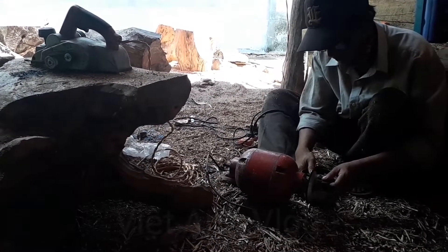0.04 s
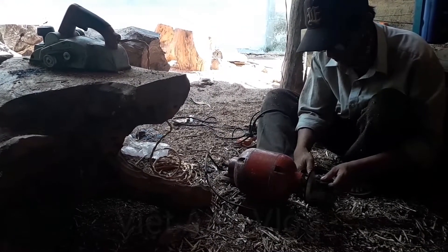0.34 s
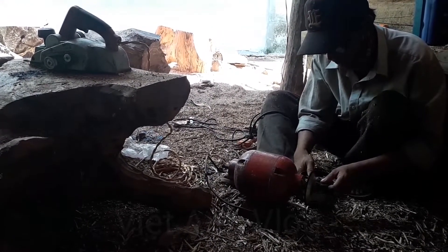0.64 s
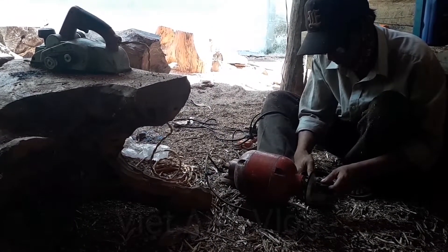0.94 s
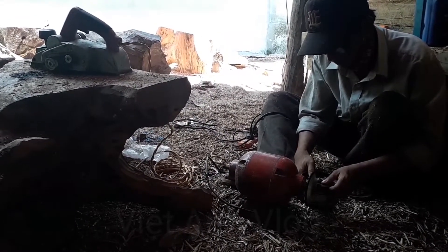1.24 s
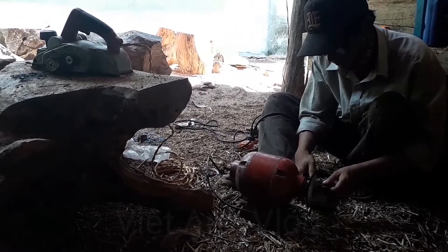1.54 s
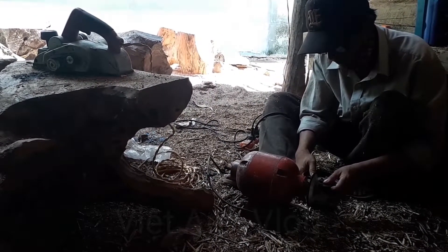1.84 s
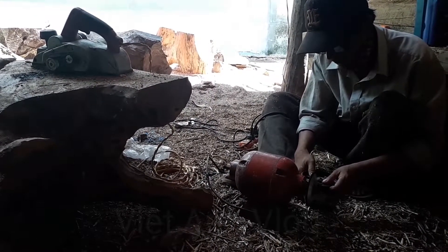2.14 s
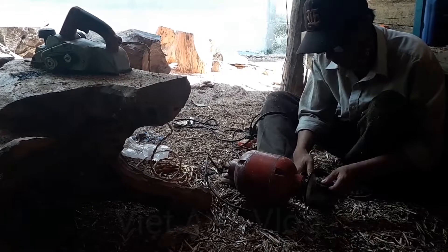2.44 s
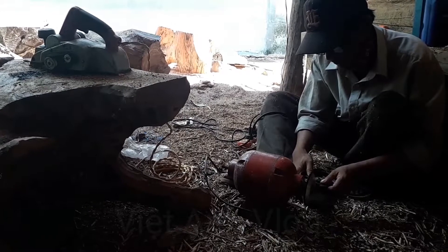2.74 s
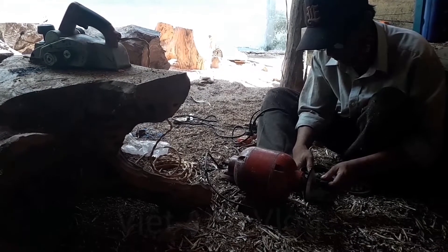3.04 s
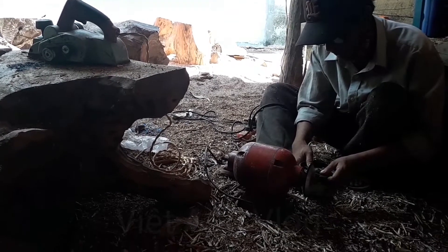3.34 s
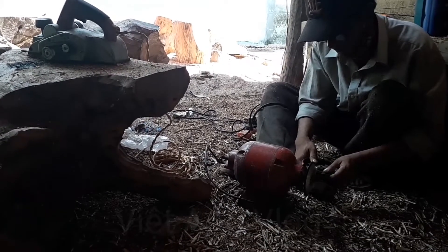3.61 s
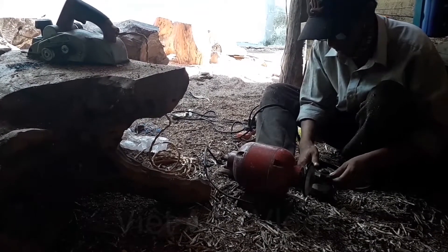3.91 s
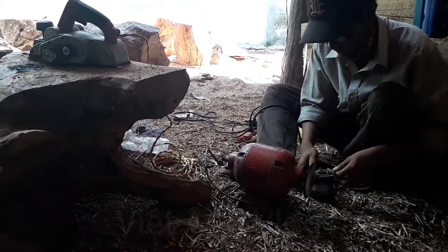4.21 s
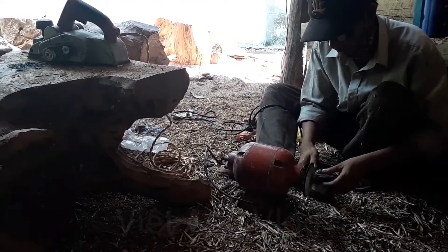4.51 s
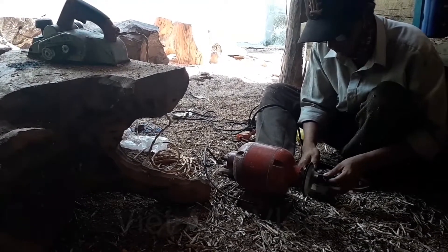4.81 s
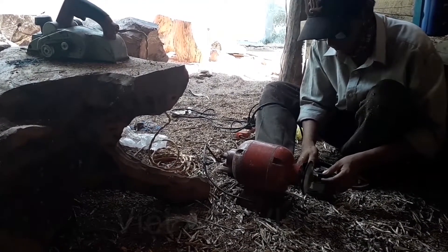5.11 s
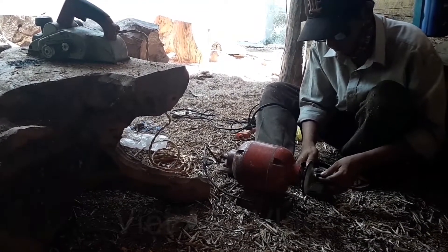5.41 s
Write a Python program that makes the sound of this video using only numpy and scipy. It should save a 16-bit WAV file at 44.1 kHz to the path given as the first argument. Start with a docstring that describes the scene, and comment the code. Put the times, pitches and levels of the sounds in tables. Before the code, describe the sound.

From the start, an electric grinder whirs in a workshop while a hand holds a piece against its wheel. The piece squeals in very fast, high-pitched bursts, uneven in loudness, over a gritty scrape, a hiss and a faint throb from the loaded motor. Around 0.3 seconds and again near 1.7 to 2.1 seconds the push eases: the squeal dips slightly in pitch and a lower ring swells. From about 2.9 seconds the piece bounces harder and the squeal flutters more roughly. At about 3.6 seconds it lifts off with a flick of hiss and a few tiny, bright ticks. The motor speeds up slightly and runs free with a quieter, steady whirr and whine. From about 4.5 seconds this gradually grows louder, and it continues to the end at about 5.6 seconds. The sound is dry and mono, with little deep bass.

```python
"""A hand holds a workpiece against an electric grinder on a workshop floor. Over the induction motor's
whirr, high spots on the wheel make the piece squeal in bursts, turn after turn, on a gritty scrape.
The push slows the shaft, raises the squeal and feeds the hiss; twice it eases and a lower ring swells.
The piece bounces harder, then lifts off with a flick of hiss and a few bright ticks. The motor speeds
up and runs free, and the mono recorder's gain control slowly brings it up."""
import sys
import numpy as np
from scipy import signal
from scipy.fft import rfft, irfft, next_fast_len
from scipy.io import wavfile
from scipy.ndimage import uniform_filter1d, minimum_filter1d, map_coordinates

SR = 44100
rng = np.random.default_rng(int(sys.argv[2]) if len(sys.argv) > 2 else 0)


def to_wav(sig):
    """Store sig (one row per channel, or 1-D mono) as 16-bit WAV at the path in sys.argv[1].

    Samples outside -1..1 are clipped; the rate is SR.
    """
    pcm = np.clip(np.atleast_2d(sig), -1, 1) * 32767
    pcm = np.round(pcm).astype(np.int16)
    wavfile.write(sys.argv[1], SR, pcm.T)  # frames by channels


N = 245195
T = np.arange(N) / SR
MAINS_HZ, FREE_HZ, SAG_HZ = 50, 47.85, 2.25  # supply; free shaft; speed lost to a firm push (force 1)
LIFT_S, LIFT_TAKES_S = 3.555, .06

# shaft speed, sagging under the push: t/s, speed/(turns per s)
SHAFT_SPEED = [(0, 45.98), (.1, 46.05), (.2, 46.72), (.3, 46.82), (.4, 45.92), (.5, 45.7), (1, 45.76),
               (1.4, 45.5), (1.7, 46.28), (1.95, 46.1), (2.1, 46.36), (2.2, 45.56), (2.8, 45.22),
               (3.5, 45.52), (3.6, 47.5), (3.75, 47.85), (5.56, 47.84)]
# whirr of bearings and fan: f/Hz, level/dB per Hz
WHIRR_SPECTRUM = [(40, -90.5), (160, -83), (240, -84), (340, -74.5), (520, -79.5), (660, -71.5), (800, -77),
                  (1150, -68), (1450, -74), (1700, -60.5), (2500, -59.5), (3400, -64), (5700, -63.5),
                  (6700, -70), (8050, -70.5), (8600, -81), (9600, -77), (11500, -80.5), (15000, -76)]
# motor housing resonances: f/Hz, width/Hz, level/dB
HOUSING_MODES = [(3673, 210, -38.5), (4590, 81, -52), (5357, 160, -36.5), (10290, 120, -52)]
# motor tones: shaft multiple, added mains multiple, free level/dB, loaded level/dB
MOTOR_TONES = [(0, 2, -65.5, -73.5), (2, 0, -65, -74.5), (0, 4, -64, -76), (5, 0, -66, -86),
               (0, 6, -62.5, -81), (13, 0, -77, -60), (16, 0, -75, -66), (18, 0, -51.5, -50),
               (20, 0, -76, -55), (18, 2, -47.5, -53.5), (18, 3, -48, -55), (18, 4, -48, -42),
               (18, 5, -54, -62), (18, 6, -48, -66), (27, 0, -66, -49)]
# bearing whine at free speed: f/Hz, relative level/dB
BEARING_TONES = [(1599, -41), (1626, -43), (1728, -39), (1836, -39), (1879, -40), (2024, -39), (2067, -39),
                 (2353, -38), (2401, -39), (2492, -40), (2632, -42), (2772, -39), (2821, -38), (2869, -41),
                 (3101, -42), (3246, -44), (3300, -45), (3435, -44), (3666, -40), (4177, -46), (4511, -43),
                 (5254, -44)]
# each ring's rhythm within one turn: shaft angle/turns, half length/turns, relative level/dB
SQUEAL_BURSTS = [(.21, .085, -2.5), (.49, .095, 0), (.74, .095, -1), (.99, .085, -4)]
LOW_BURSTS = [(1, 0.33, -1.5), (.3, 0.062, -9)]
MIDDLE_BURSTS = [(0.271, 0.2, 1.2), (.56, 0.032, 4), (0.878, 0.13, 1.7)]
# fader ride on the squeal: t/s, relative level/dB
SQUEAL_FADER = [(0.0, -12), (0.33, -11.5), (0.35, -20), (0.45, -13), (1.02, -15.5), (1.28, -19),
                (1.49, -11.5), (1.76, -17), (1.91, -12.5), (2.01, -16), (2.24, -11.5), (2.33, -20),
                (2.38, -11), (2.54, -19.5), (2.76, -14.5), (3.55, -17.5)]
# shudder of the rest under the piece: f/Hz, relative level/dB
SHUDDER_SPECTRUM = [(220, -34), (440, 0), (720, 12), (950, 1), (2000, -45)]
# scrape of wheel on piece: f/Hz, relative level/dB
SCRAPE_SPECTRUM = [(100, -100), (400, -98), (750, -110), (1350, -83), (1750, -60), (2700, -59.5),
                   (3400, -72.5), (4000, -62.5), (4400, -38.5), (4780, -62.5), (5100, -87), (5900, -62),
                   (6600, -103), (9000, -83)]
# the piece's lesser resonances: f/Hz, width/Hz, relative level/dB
PIECE_MODES = [(2402, 67, -33.5), (3640, 36, -35.5), (4030, 120, -30), (4920, 110, -36), (5550, 52, -43),
               (5870, 150, -51)]
# hiss of the grit: f/Hz, relative level/dB
HISS_SPECTRUM = [(3000, -18.5), (5500, 8.5), (6600, -6), (8050, 4.5), (8800, -6), (11500, -6.5),
                 (13000, 2.5), (14000, 0.5), (15000, 2.5)]
# motor tones that throb under load: shaft multiple, relative level/dB
THROB_TONES = [(11, -52.5), (20, -47)]
# motor tones that stand out near one force: shaft multiple, force, full level/dB
STRAIN_HUMS = [(15, .45, -43), (16, .72, -46.5), (13, .92, -52)]
# last grains catching the edge: t/s, relative peak level/dB
LAST_TICKS = [(3.5443, -12), (3.566, -10), (3.5824, -13), (3.5872, -6), (3.6042, -9), (3.6296, -11.5)]


def undb(db):
    """Decibels to gain."""
    return 10 ** (np.asarray(db) / 20)


def unit(x):
    """Scale to rms 1."""
    return x / np.sqrt(np.mean(x ** 2))


def walk(rate):
    """Smooth random drift, rms 1, with `rate` new values a second."""
    knots = rng.standard_normal(int(N / SR * 400))
    return unit(map_coordinates(knots, [T * rate], order=3, mode="wrap"))


def colour(x, points):
    """EQ white sound to a curve of f/Hz, level/dB per Hz points."""
    hz, db = np.transpose(points)
    size = next_fast_len(N)
    f = np.maximum(np.fft.rfftfreq(size, 1 / SR), 1)
    eq = undb(np.interp(np.log(f), np.log(hz), db))
    return irfft(rfft(x, size) * eq, size)[:N] * np.sqrt(SR / 2)


def resonate(x, hz, width):
    """One resonance with steep skirts, rms 1."""
    b, a = signal.iirpeak(hz, hz / width, fs=SR)
    return unit(signal.lfilter(b, a, signal.lfilter(b, a, x)))


def body(x, modes):
    """A bank of resonances shaken by x."""
    return sum(undb(db) * resonate(x, hz, width) for hz, width, db in modes)


def surface(turns, memory, size=1024):
    """Roughness round a turning part; each turn keeps a share of the last one's texture."""
    fresh = rng.standard_normal((int(turns[-1]) + 20, size))
    worn = signal.lfilter([1], [1, -memory], fresh, axis=0)
    return unit(map_coordinates(worn.ravel(), [(turns + 10) * size], order=3))


def push_gain(force, firm_db, lost_db, db_per_s):
    """A layer's fader: it falls ever faster as the push eases, and drifts with time."""
    return undb(firm_db - lost_db * np.maximum(1 - force, 0) ** 2 + db_per_s * T)


def sweet_spot(force, at_force, spread, build_s=.14):
    """0-1: how far a resonance that needs a certain force has built up."""
    return uniform_filter1d(np.exp(-((force - at_force) / spread) ** 2), int(build_s * SR))


def motor(turns, load):
    """Rotor slots and mains sing clean tones; bearings and fan add whine and a whirr in the housing."""
    out = colour(surface(turns, memory=.27), WHIRR_SPECTRUM)
    out += body(surface(turns, memory=.22), HOUSING_MODES)
    for shaft, mains, free_db, load_db in MOTOR_TONES:
        cycles = shaft * turns + mains * MAINS_HZ * T + rng.random()
        level_db = free_db + load * (load_db - free_db) + walk(9)
        out += undb(level_db) * np.sqrt(2) * np.sin(2 * np.pi * cycles)
    for hz, db in BEARING_TONES:
        phase = 2 * np.pi * hz * turns / FREE_HZ + .85 * walk(11)
        out += undb(db - 3 - 6.4 * load + 2.1 * walk(16)) * np.sqrt(2) * np.sin(phase)
    return out


def drone(hz, db):
    """A faint, steady low drone under the scene."""
    return undb(db) * np.sqrt(2) * np.sin(2 * np.pi * hz * T + .4 * walk(6.3))


def chatter(turns, hz, bursts, slip_rad, scatter_db, detune_hz):
    """Each high spot swells a ring once a turn, a little off in pitch, timing, phase and level."""
    out, count = np.zeros(N), int(turns[-1]) + 4
    hz = np.broadcast_to(hz, N)
    for angle, half_length, db in bursts:
        detune, late, slip, accent = rng.standard_normal((count, 4)).T
        place = turns - angle + 2
        turn = np.round(place).astype(int)
        centre_s = np.interp(np.arange(count), place, T)
        pitch = np.interp(centre_s, T, hz) + detune_hz * detune
        swell = np.exp(-((place - turn - .015 * late[turn]) / half_length) ** 2)
        phase = 2 * np.pi * pitch[turn] * (T - centre_s[turn]) + np.cumsum(slip_rad * slip)[turn]
        out += undb(db + scatter_db * accent)[turn] * swell * np.sin(phase)
    return unit(out)


def squeal(turns, force):
    """The lead voice: bursts from the high spots, roughened by grit, ring the piece's main resonance."""
    pitch_hz = 4385 + 250 * (force - 1)
    bursts = chatter(turns, pitch_hz, SQUEAL_BURSTS, slip_rad=.6, scatter_db=1.3, detune_hz=22)
    rough = .36 * resonate(surface(turns, memory=.85), hz=4380, width=450)
    bounce = np.where(T > 2.94, .86, .064)  # once a turn, much deeper shortly before the lift
    pressure = 1 + bounce * np.cos(2 * np.pi * (turns - .58))
    pressure /= np.sqrt(1 + bounce + bounce ** 2 / 2)  # holds the level down as the bounce deepens
    rung = resonate(pressure * (bursts + rough), hz=4375, width=540)
    fader_db = np.interp(T, *np.transpose(SQUEAL_FADER))
    return undb(fader_db - 1.8) * rung


def low_ring(turns, force, rub):
    """Under a light touch the piece's low ring swells, and the rest shudders along with it."""
    ring = chatter(turns, 1526, LOW_BURSTS, slip_rad=.34, scatter_db=1.5, detune_hz=13)
    shudder = undb(-17.5) * unit(colour(rub, SHUDDER_SPECTRUM))
    level_db = -36 + .9 * T + 8 * sweet_spot(force, at_force=.62, spread=.16)
    return undb(level_db) * (ring + shudder)


def middle_ring(turns, force):
    """A ring that needs a firm push and climbs in pitch as the piece is worked."""
    pitch_hz = np.interp(T, (1, 3.1), (2930, 3037))
    ring = chatter(turns, pitch_hz, MIDDLE_BURSTS, slip_rad=.62, scatter_db=1, detune_hz=47.6)
    return push_gain(force, firm_db=-28, lost_db=38, db_per_s=.7) * ring


def scrape(turns, force, rub):
    """Grit rubs the piece and rings its lesser modes; the out-of-true wheel swells it once a turn."""
    texture = colour(rub, SCRAPE_SPECTRUM) + body(surface(turns, memory=.83), PIECE_MODES)
    runout = 1 + .22 * np.cos(2 * np.pi * turns)
    return push_gain(force, firm_db=0, lost_db=5, db_per_s=.075) * texture * runout


def grit_hiss(turns, force, contact):
    """Grit bites in uneven grains, hardest at one proud spot on the rim; the edge flares sliding off."""
    proud_spot = np.exp(-((turns - .75) % 1) / .16)
    grains = surface(turns, memory=.43) * undb(2.5 * proud_spot + 2 * walk(380))
    pressed = contact * push_gain(force, firm_db=-22, lost_db=51, db_per_s=-1.64)
    edge_flare = undb(-21.5) * np.exp(-((T - 3.59) / .045) ** 2)
    return (pressed + edge_flare) * unit(colour(grains, HISS_SPECTRUM))


def throb(turns, force):
    """Under load two low motor tones throb together, slower as the push grows."""
    throb_hz = 7.5 - 6.5 * (force - 1)
    beat = np.cos(np.pi * np.cumsum(throb_hz) / SR + .3 * walk(2))
    return sum(undb(db) * 2 * beat * np.sin(2 * np.pi * order * turns) for order, db in THROB_TONES)


def strain_hums(turns, force):
    """Motor tones that come and go as the push changes."""
    out = np.zeros(N)
    for order, at_force, db in STRAIN_HUMS:
        swell = sweet_spot(force, at_force, spread=.18)
        out += undb(db) * swell * np.sqrt(2) * np.sin(2 * np.pi * order * turns)
    return out


def last_ticks(decay_s, trim_db):
    """The last grains catch the edge as it lifts away: tiny, very bright scratches."""
    envelope = sum(undb(db + trim_db) * (T >= s) * np.exp(-np.abs(T - s) / decay_s)
                   for s, db in LAST_TICKS)
    return envelope * resonate(rng.standard_normal(N), hz=14600, width=2500)


def scene():
    """One shaft sets the rhythm, and its sag tells the hand's force; both channels carry the same mix."""
    speed = np.interp(T, *np.transpose(SHAFT_SPEED))
    turns = np.cumsum(speed) / SR
    force = (FREE_HZ - speed) / SAG_HZ
    contact = np.clip(1 - (T - LIFT_S) / LIFT_TAKES_S, 0, 1)
    strain = throb(turns, force) + strain_hums(turns, force)
    rub = surface(turns, memory=.67)
    rings = low_ring(turns, force, rub) + middle_ring(turns, force) + squeal(turns, force)
    grinding = contact * (strain + rings + scrape(turns, force, rub))
    sizzle = grit_hiss(turns, force, contact) + last_ticks(decay_s=.0022, trim_db=-7.5)
    mix = grinding + sizzle + motor(turns, load=contact) + drone(hz=67, db=-69)
    return np.array([mix, mix])


def gain_control(x, target_db, most_db, hold_s, rise_s):
    """Once the sound has stayed quiet for the hold time, the gain climbs."""
    level_db = 10 * np.log10(uniform_filter1d(x[0] ** 2, size=2048) + 1e-12)
    headroom_db = np.clip(target_db - level_db, 0, most_db)
    half_hold, half_rise = int(hold_s * SR / 2), int(rise_s * SR / 2)
    held_db = minimum_filter1d(headroom_db, 2 * half_hold + 1, origin=half_hold)
    return x * undb(uniform_filter1d(held_db, 2 * half_rise + 1, origin=half_rise))


def record(dry):
    """A small microphone without deep bass, then gain control, rounded peaks and a steep top cut."""
    low_cut_hz, top_cut_hz, ceiling = 55, 15500, .94
    thin = signal.sosfilt(signal.butter(4, low_cut_hz, "high", fs=SR, output="sos"), dry)
    levelled = gain_control(thin, target_db=-14.5, most_db=7, hold_s=.98, rise_s=.46)
    rounded = levelled / (1 + (levelled / ceiling) ** 8) ** (1 / 8)
    return signal.sosfilt(signal.ellip(12, .2, 80, top_cut_hz, fs=SR, output="sos"), rounded)


dry = scene()
out = record(dry)
to_wav(out)
```